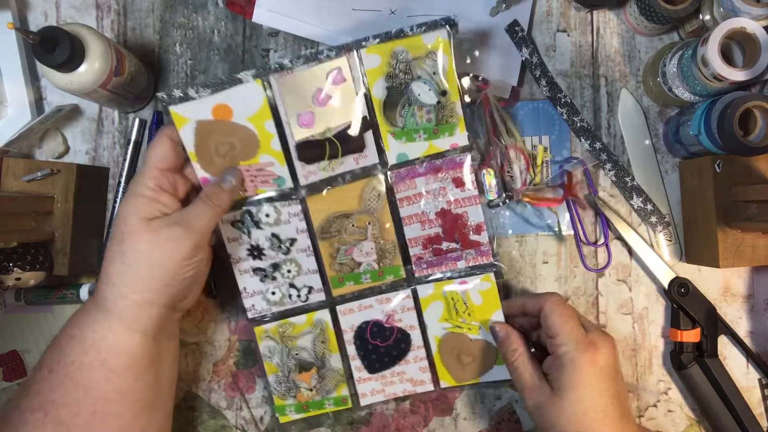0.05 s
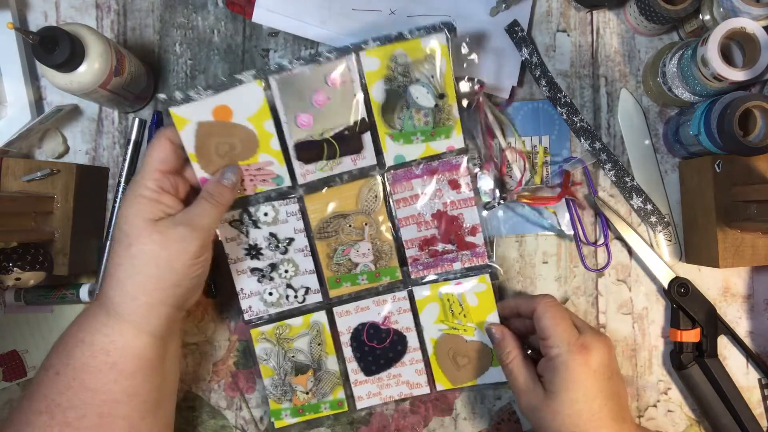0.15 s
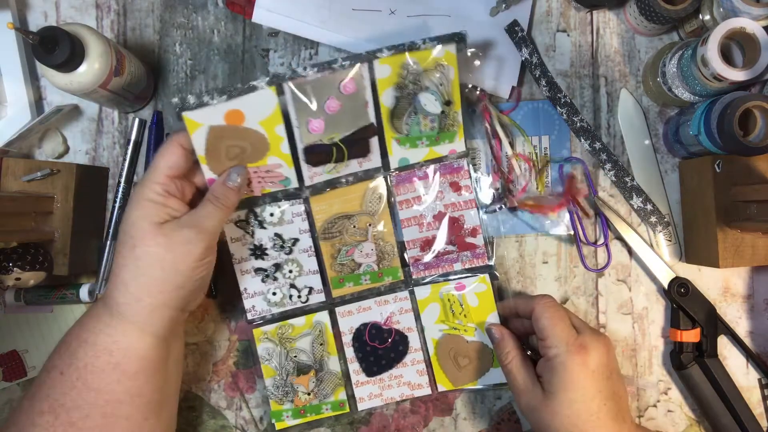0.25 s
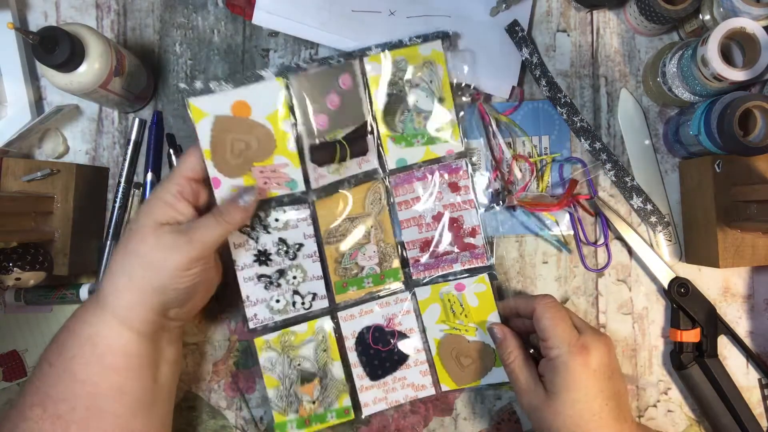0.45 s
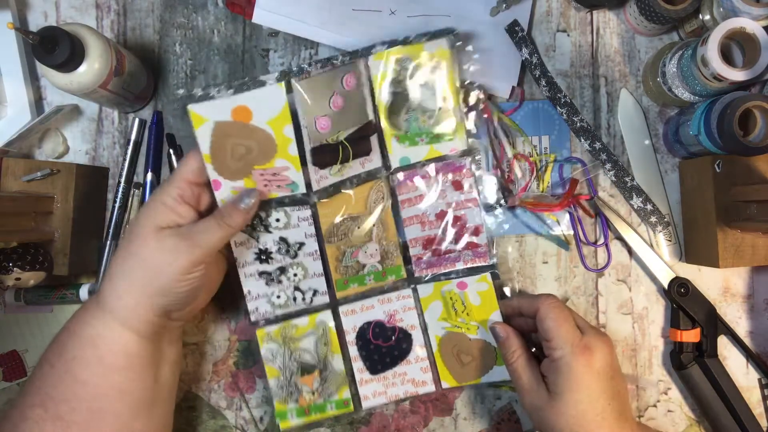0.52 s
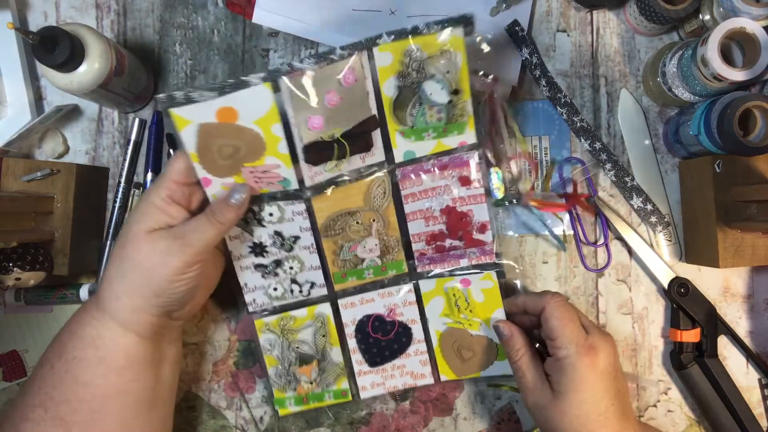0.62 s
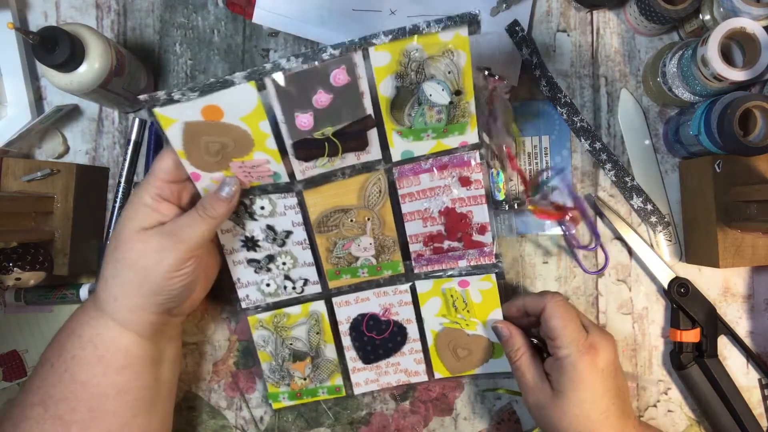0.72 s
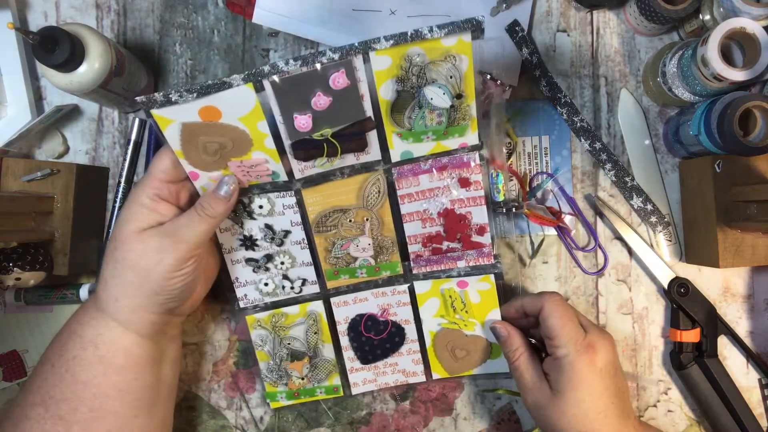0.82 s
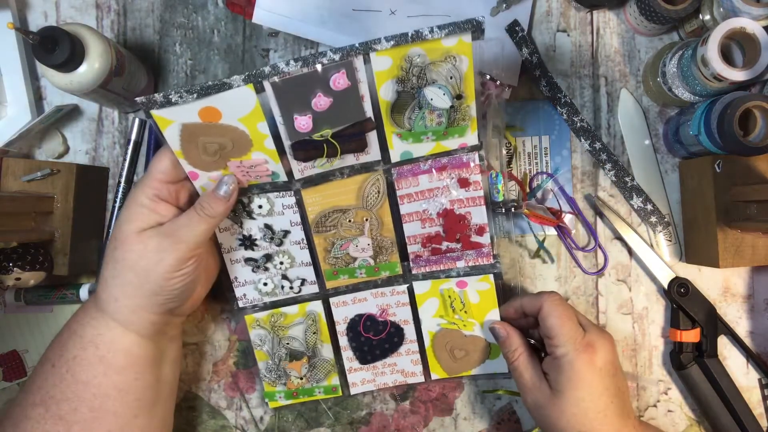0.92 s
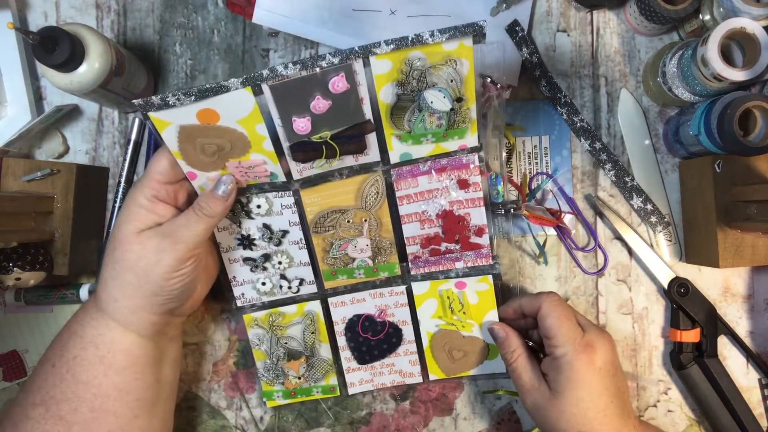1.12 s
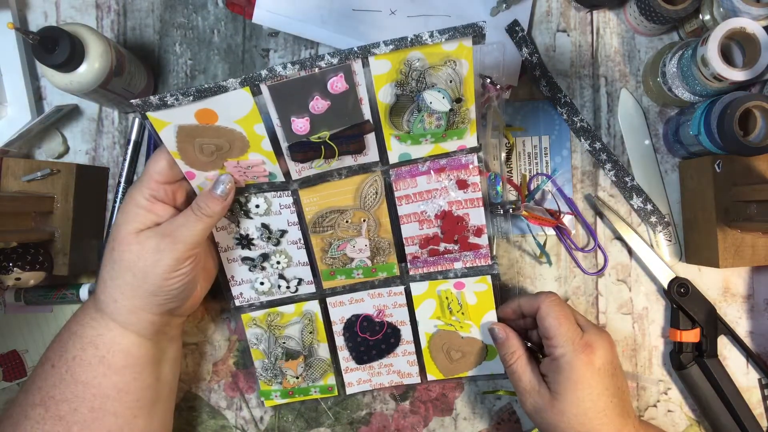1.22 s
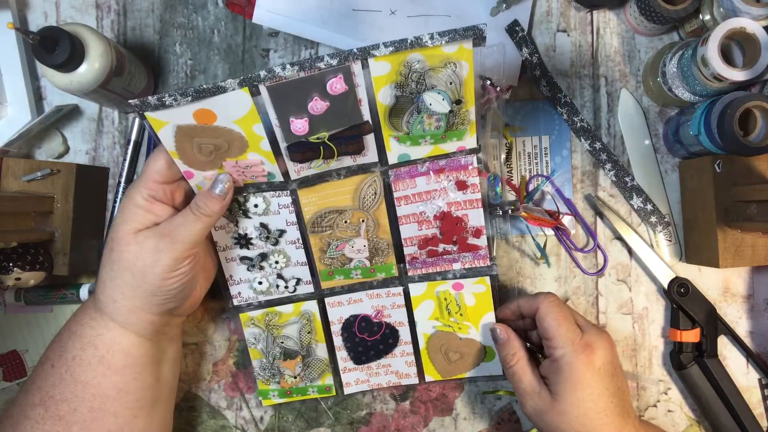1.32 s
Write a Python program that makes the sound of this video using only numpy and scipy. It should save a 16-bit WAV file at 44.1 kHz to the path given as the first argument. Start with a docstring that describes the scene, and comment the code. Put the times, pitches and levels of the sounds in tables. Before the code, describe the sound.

A clear plastic pocket sleeve crinkles with sharp crackling snaps, fading to near silence, close up

```python
"""In a small room, just above a desk, two hands tilt a clear plastic pocket sleeve full of cards.
Creases in the film buckle one by one: each gives a sharp crack (a click, a brief ring and a shiver
of noise) and a hollow pop (a click through a band filter). Between them the film slides and rustles,
made from shaped noise and tiny random clicks, and it grows quieter towards the end.
Echoes of the snaps are dying noise; a faint mains hum (sines) and still air (noise) lie underneath."""
import sys
import numpy as np
from scipy import signal
from scipy.fft import rfft, irfft
from scipy.io import wavfile

SR = 44100
rng = np.random.default_rng(int(sys.argv[2]) if len(sys.argv) > 2 else 0)


def log_audio(samples):
    """Write samples as a 16-bit WAV file to the path given in sys.argv[1]."""
    # one column per channel
    frames = np.atleast_2d(samples).T
    # limit to full scale, then quantise
    limited = np.clip(frames, -1, 1)
    pcm = np.round(limited * 32767).astype(np.int16)
    wavfile.write(sys.argv[1], SR, pcm)


N = 59535
T = np.arange(N) / SR   # time of each sample in seconds

# tones of the mains hum: f/Hz, rms level/dB
HUM_TONES = [(58, -74), (120, -76.5), (241, -90.5)]
# spectrum shape of the still air: f/Hz, relative level/dB
AIR_COLOUR = [(18, -41), (30, -6.5), (64, -3), (90, -14.5), (124, -2.5), (165, -16.5), (239, -9),
              (303, -17.5), (345, -23), (473, -24), (616, -19.5), (721, -26.5), (16000, -37.5)]
AIR_RMS_DB = -69.5

# the sheet sways in the hands: t/s, length/s, level/dB
SWAYS = [(-.06, 0.19, -58), (.08, 0.17, -67.5), (.51, 0.19, -65.5)]
SWAY_HZ = 85

# fingers nudge the cards: t/s, length/s, level/dB
NUDGES = [(-.01, 0.049, -57.5), (.515, 0.065, -64.5)]
# resonances of the nudged cards: f/Hz, width/Hz, relative level/dB
CARD_RESONANCES = [(209.7, 22, 9), (372, 53, -21.5), (510, 60, -5)]

# the film drags with a dry rasp: t/s, length/s, level/dB
DRAGS = [(0, 0.15, -61.5), (.145, 0.054, -54.5), (.285, 0.089, -63.5)]
# resonances of the rasp: f/Hz, width/Hz, relative level/dB
RASP_RESONANCES = [(1550, 300, -0.5), (1966, 230, -2.5), (3380, 460, -10.5)]

# loudness of the film sliding on cards and fingers: t/s, level/dB
SLIDE_LEVEL = [(0, -56.5), (.09, -60), (.13, -59.5), (.17, -59), (.205, -60.5), (.26, -61.5), (.33, -61.5),
               (.36, -68), (.41, -60.5), (.47, -60), (.53, -64), (.59, -67), (.67, -63.5), (.76, -61),
               (.84, -68), (.885, -71.5), (.93, -80), (1.01, -74), (1.05, -80), (1.10, -76.5), (1.2, -87.5),
               (1.35, -79)]
# spectrum shape of the sliding: f/Hz, relative level/dB
SLIDE_COLOUR = [(150, 2.5), (350, -9.5), (600, 1), (1000, 0.5), (1800, 1), (2600, -4), (5000, -6.5),
                (8000, -12.5), (16000, -18)]
TICKS_PER_S, TICKS_DB = 900, 2   # tiny ticks; level against the raw hiss
FLIPS_PER_S, FLIPS_DB, FLIPS_BAND_HZ = 110, -11, [682, 1420]   # pocket flips; level against hiss and ticks
CLICK_SPREAD_DB = 2.5   # how uneven the random clicks are

# creases buckling: t/s, pop level/dB, pop f/Hz, crack level/dB, crack ring f/Hz, crack top f/Hz
SNAPS = [(.0090, -52.5, 540, -40.5, 5170, 7240), (0.0174, -46, 1410, -68, 4500, 5150),
         (.0586, -75, 1090, -45.5, 6000, 13000), (.0802, -50.5, 900, -65, 3000, 3950),
         (0.0884, -54, 1830, -44, 2100, 5800), (0.1148, -76, 980, -53, 7500, 13200),
         (.1370, -48.5, 520, -62, 2970, 4000), (.1423, -83, 900, -47.5, 4240, 5400),
         (.2201, -20, 1036, -22.5, 4580, 12800), (.2385, -44, 1100, -50.5, 3000, 4050),
         (0.2696, -49, 1360, -39.5, 2700, 5860), (0.2771, -31, 1295, -28.5, 6600, 9900),
         (0.3407, -60, 1200, -44, 4260, 6500), (.3900, -50, 1200, -54, 3500, 6000),
         (.4050, -44.5, 1450, -47, 2500, 7500), (0.4152, -50, 1750, -55, 2460, 4080),
         (.4300, -20.5, 1030, -21, 3890, 13000), (0.4432, -30.5, 890, -25, 5300, 5800),
         (.4870, -46, 970, -62, 3000, 3900), (0.4943, -44, 1020, -67, 3000, 3960),
         (0.5126, -51.5, 1470, -46.5, 2420, 4000), (0.5254, -53.5, 398, -38, 2750, 4500),
         (0.554, -51, 940, -66, 3000, 4000), (0.574, -46.5, 1020, -82, 3000, 4000),
         (0.5883, -59, 996, -50, 6300, 13200), (0.6078, -37.5, 1120, -58, 1650, 3000),
         (0.614, -39, 1180, -49, 1610, 3040), (0.6462, -41, 900, -38.5, 2410, 5140),
         (.6642, -49.5, 860, -74.5, 2960, 4000), (0.695, -69, 1030, -41, 6400, 12200),
         (.6998, -51, 1090, -52, 2480, 4000), (0.706, -19.5, 959, -20.5, 4640, 12000),
         (.7276, -39.5, 787, -30.5, 2420, 6100), (0.7614, -65, 980, -45, 10900, 14000),
         (0.7652, -68, 1100, -41.5, 4200, 4500), (0.7658, -38.5, 873, -72, 3000, 4000),
         (.7710, -73, 1020, -43.5, 7840, 11200), (.7823, -47, 860, -66, 3000, 4000),
         (.7893, -49, 740, -74, 3000, 4000), (0.7981, -52, 990, -41.5, 5800, 11800),
         (0.8028, -44.5, 800, -44, 2600, 8100), (0.8139, -28.5, 828, -26.5, 1963, 6000),
         (0.8533, -55.5, 1020, -46.5, 7800, 9700), (.9100, -69, 1230, -40.5, 5800, 12600),
         (0.9575, -67.5, 1020, -61, 1980, 5250), (1.0060, -59.5, 990, -60, 2500, 4100),
         (1.0120, -58, 986, -64.5, 3050, 4000), (1.0745, -59.5, 1020, -73, 2980, 4000),
         (1.3390, -61, 980, -70, 1960, 4000)]
# faint fixed pitches that the desk and things close by add to each snap:
# f/Hz, level/dB, time to fall by 60 dB/s
NEARBY_RESONANCES = [(919, -59.5, 0.14), (1298, -60, 0.13), (1548, -52, 0.059), (1830, -74, 0.11),
                     (2570, -47.5, 0.023)]

CRACK_LOW_HZ = 1460   # a crack's main body is thinned below this
CRACK_RING_DB, CRACK_RING_CYCLES = -18.5, 19.4   # cycles for the crease's ring to fall by 60 dB
BOUNCE_DB, BOUNCE_CYCLES = -12.5, 2.15   # return from the pocket's seam, after this many ring cycles
SHIVER_DB, SHIVER_T60_S, SHIVER_LAG_S = -1.5, 0.012, 0.00072   # the film shivers on after a crack
GLINT_DB, GLINT_HZ = -25, 11800   # even a dull crack keeps a glint of top treble

POP_WIDTH, POP_LAG_S = 1.35, 0.0001   # band edges as a ratio to the pitch; the pop trails the crack
KNOCK_DB, KNOCK_BAND_HZ = -24, [317, 648]   # dull knock of the cards, level against the pop

DESK_DELAY_S, DESK_T60_S, DESK_DB = 0.0022, 0.038, -13.5   # scatter from the desk and its clutter
ROOM_DELAY_S, ROOM_T60_S, ROOM_DB = 0.009, 0.16, -17.5
# spectrum change of both echoes: f/Hz, level/dB
ECHO_COLOUR = [(200, 13.5), (1000, -2.5), (2500, -0.5), (5000, 0.5), (9000, -2), (16000, -9)]

# hollows in the microphone's response: f/Hz, width/Hz, depth/dB
MIC_DIPS = [(10370, 2360, -7.5)]
BASS_CUT_HZ, TREBLE_CUT_HZ = 46, 16750


def from_db(db):
    """Turn decibels into a plain multiplier."""
    return 10 ** (np.asarray(db) / 20)


def rms_one(x):
    """Scale a sound to an rms (average strength) of 1."""
    return x / np.sqrt(np.mean(x ** 2) + 1e-20)


def butter(x, order, hz, kind):
    """Filter with a Butterworth filter, which only looks back in time."""
    sections = signal.butter(order, hz, kind, fs=SR, output="sos")
    return signal.sosfilt(sections, x)


def band_edges(hz, width):
    """Lower and upper edge of a band around a middle frequency."""
    return [hz - width / 2, hz + width / 2]


def colour(x, points):
    """Shape a sound's spectrum by joining points of f/Hz, level/dB along a log frequency scale."""
    hz, db = np.transpose(points)
    bins_hz = np.maximum(np.arange(len(x) // 2 + 1) * SR / len(x), 1)
    gain = from_db(np.interp(np.log(bins_hz), np.log(hz), db))
    return irfft(rfft(x) * gain, len(x))


def add(out, s, sound):
    """Mix a sound in, starting at a time in seconds."""
    start = int(round(s * SR))
    out[start:start + len(sound)] += sound[:N - start]


def later(x, s):
    """Delay by a time that may fall between samples."""
    times = T[:len(x)]
    return np.interp(times - s, times, x, left=0)


def swells(rows):
    """Smooth half-sine rises and falls, from rows of t/s, length/s, level/dB."""
    return sum(from_db(db) * np.sin(np.pi * np.clip((T - s) / length, 0, 1)) for s, length, db in rows)


def clicks(per_s):
    """Random clicks of uneven size and either sign."""
    size_db = CLICK_SPREAD_DB * np.minimum(rng.exponential(1, N), 3)
    sizes = from_db(size_db) * rng.choice([-1, 1], N)
    happens = rng.random(N) < per_s / SR
    return sizes * happens + 1e-18


def dying_noise(t60, size):
    """Noise that falls by 60 dB in t60 seconds, with a total energy of 1."""
    burst = rng.standard_normal(size) * from_db(-60 * T[:size] / t60)
    return burst / np.sqrt(np.sum(burst ** 2))


def ring(x, hz, t60):
    """Resonator: a click of height 1 starts a dying sine of about height 1."""
    shrink = from_db(-60 / (t60 * SR))   # loss per sample
    turn = 2 * np.pi * hz / SR           # angle per sample
    return signal.lfilter([0, np.sin(turn)], [1, -2 * shrink * np.cos(turn), shrink ** 2], x + 1e-18)


def strokes(rows, resonances):
    """Resonances shaken by noise under smooth swells."""
    body = np.zeros(N)
    for hz, width, db in resonances:
        shaken = butter(rng.standard_normal(2 * N), order=2, hz=band_edges(hz, width), kind="band")
        body += from_db(db) * rms_one(shaken[N:])   # the first half lets the filter settle
    return swells(rows) * rms_one(body)


def room_tone():
    """Still air as shaped noise, with a low electric hum of steady sines."""
    hum = np.zeros(N)
    for hz, db in HUM_TONES:
        # the square root of 2 gives a sine an rms of 1
        hum += from_db(db) * np.sqrt(2) * np.sin(2 * np.pi * (hz * T + rng.random()))
    air = rms_one(colour(rng.standard_normal(N), AIR_COLOUR))
    return hum + from_db(AIR_RMS_DB) * air


def sway():
    """The whole sheet wobbles at one low pitch while it is moved."""
    wobble = np.sqrt(2) * np.sin(2 * np.pi * (SWAY_HZ * T + rng.random()))
    return swells(SWAYS) * wobble


def nudges():
    """Fingers nudge the cards and shake their resonances."""
    return strokes(NUDGES, CARD_RESONANCES)


def drags():
    """The film drags, and its rubbing shakes the resonances of a dry rasp."""
    return strokes(DRAGS, RASP_RESONANCES)


def rustle():
    """Sliding film rubs as a soft hiss, with many tiny ticks and pocket flips in it."""
    ticks = rms_one(clicks(TICKS_PER_S))
    friction = rng.standard_normal(N) + from_db(TICKS_DB) * ticks
    flips = rms_one(butter(clicks(FLIPS_PER_S), order=2, hz=FLIPS_BAND_HZ, kind="band"))
    level = from_db(np.interp(T, *np.transpose(SLIDE_LEVEL)))
    return level * (rms_one(colour(friction, SLIDE_COLOUR)) + from_db(FLIPS_DB) * flips)


def crack(click, ring_hz, top_hz):
    """A crease buckles: a bright click with a ring, a seam bounce and a shiver; the bare click peaks at 1."""
    crease = from_db(CRACK_RING_DB) * ring(click, ring_hz, CRACK_RING_CYCLES / ring_hz)
    # the sinc is a click that may fall between samples
    bounce = from_db(BOUNCE_DB) * np.sinc(SR * (T[:len(click)] - BOUNCE_CYCLES / ring_hz))
    shiver = from_db(SHIVER_DB) * later(dying_noise(SHIVER_T60_S, size=len(click)), SHIVER_LAG_S)
    whole = click + crease + bounce + shiver
    thin = butter([click, whole], order=2, hz=CRACK_LOW_HZ, kind="high")
    bare, full = butter(thin, order=3, hz=top_hz, kind="low")
    glint = from_db(GLINT_DB) * butter(click + shiver, order=3, hz=GLINT_HZ, kind="high")
    return (full + glint) / np.abs(bare).max()


def pop(click, hz):
    """The pocket flips: a short hollow wave of height 1, over a dull knock from the cards inside."""
    flip = butter(click, order=3, hz=[hz / POP_WIDTH, hz * POP_WIDTH], kind="band")
    knock = butter(click, order=2, hz=KNOCK_BAND_HZ, kind="band")
    return flip / np.abs(flip).max() + from_db(KNOCK_DB) * knock / np.abs(knock).max()


def snaps():
    """Each crease cracks and its pocket pops; the desk and things close by add faint fixed pitches."""
    out = np.zeros(N)
    click = signal.unit_impulse(2048) + 1e-18
    for s, pop_db, pop_hz, crack_db, ring_hz, top_hz in SNAPS:
        add(out, s, from_db(crack_db) * crack(click, ring_hz, top_hz))
        add(out, s + POP_LAG_S, from_db(pop_db) * pop(click, pop_hz))
    nearby = sum(from_db(db) * ring(out, hz, t60) for hz, db, t60 in NEARBY_RESONANCES)
    return out + nearby


def reflections(x):
    """Many small echoes, as dying noise: quick scatter from the desk, then the short tail of the room."""
    response = np.zeros(N)
    for delay, t60, db in ((DESK_DELAY_S, DESK_T60_S, DESK_DB), (ROOM_DELAY_S, ROOM_T60_S, ROOM_DB)):
        tail = colour(dying_noise(t60, size=N), ECHO_COLOUR)
        add(response, delay, from_db(db) * tail[:N // 2])
    return signal.fftconvolve(x, response)[:N]


def scene():
    """The sleeve close to the microphone, in its room; only the snaps get echoes."""
    handling = sway() + nudges() + drags() + rustle()
    crinkle = snaps()
    return (room_tone() + handling + crinkle + reflections(crinkle))[None]


def record(dry):
    """The microphone colours the sound; the deepest bass and the very top are cut."""
    sound = butter(dry, order=3, hz=BASS_CUT_HZ, kind="high")
    for hz, width, db in MIC_DIPS:
        band = butter(sound, order=1, hz=band_edges(hz, width), kind="band")
        sound = sound + (from_db(db) - 1) * band   # takes part of the band away
    steep_cut = signal.ellip(10, 0.2, 70, TREBLE_CUT_HZ, fs=SR, output="sos")
    return signal.sosfilt(steep_cut, sound)


dry = scene()
out = record(dry)
log_audio(out)
```